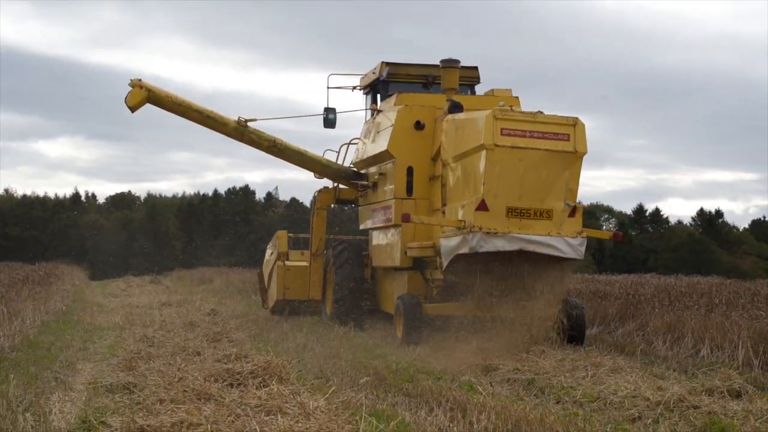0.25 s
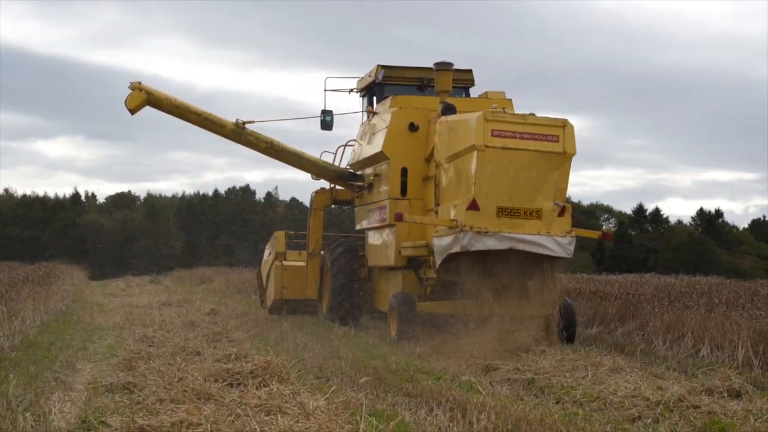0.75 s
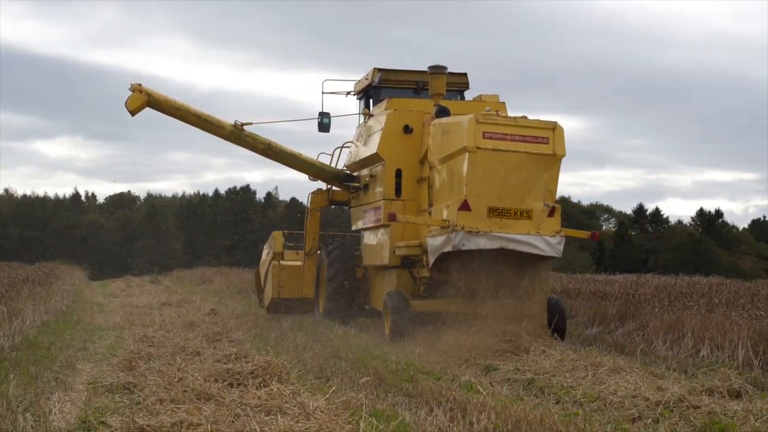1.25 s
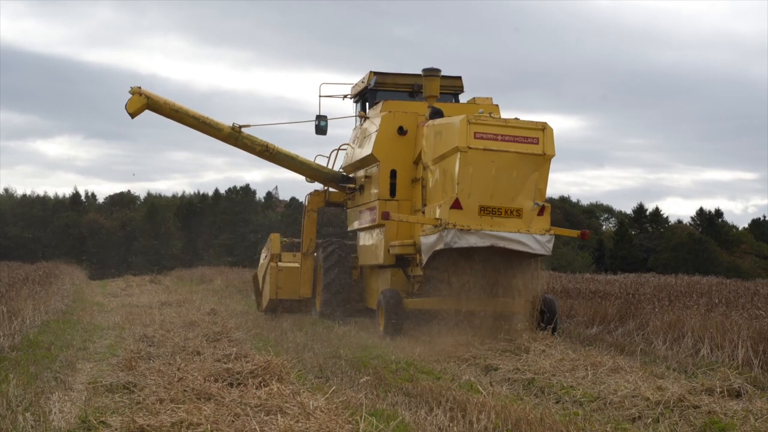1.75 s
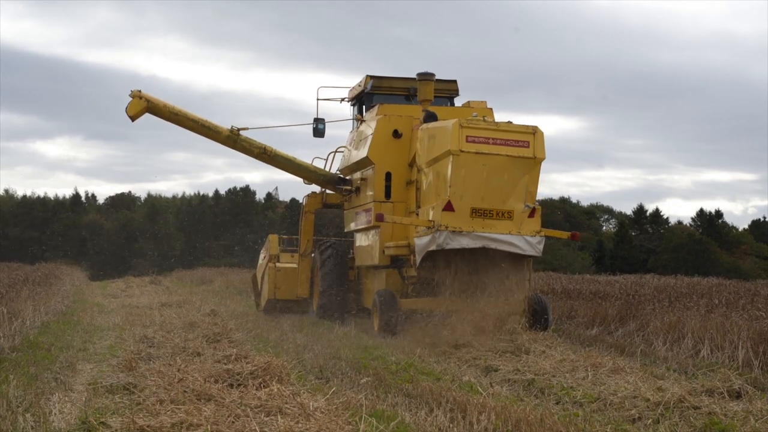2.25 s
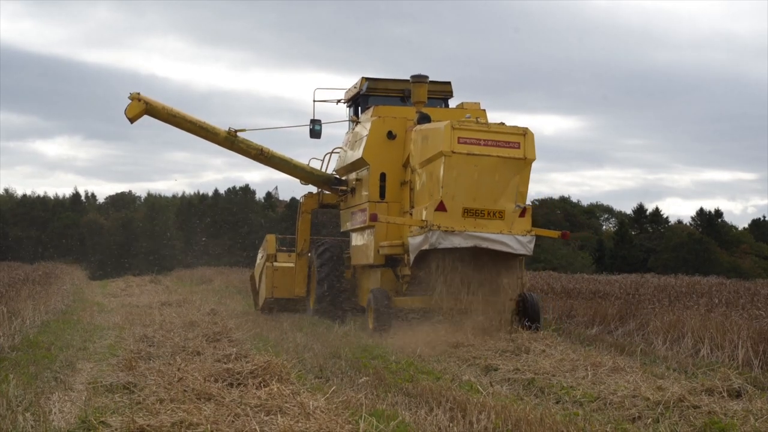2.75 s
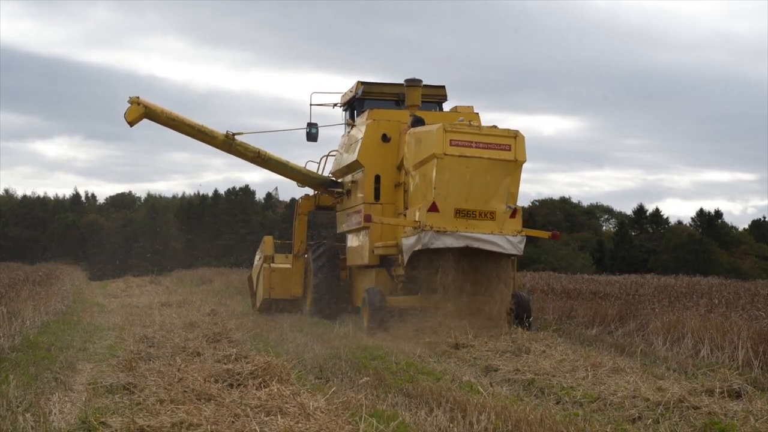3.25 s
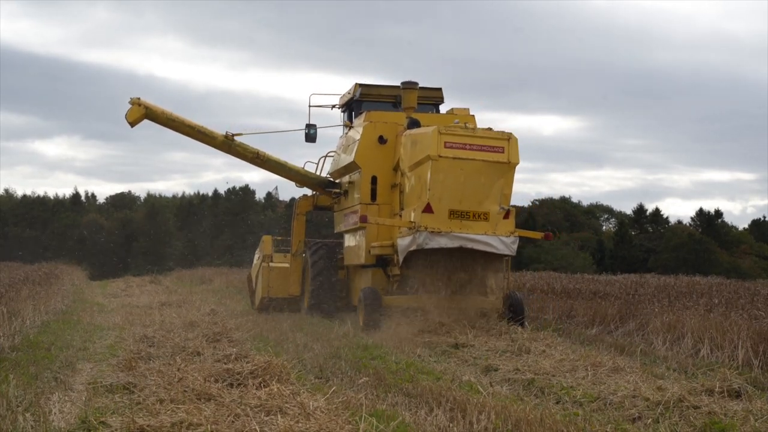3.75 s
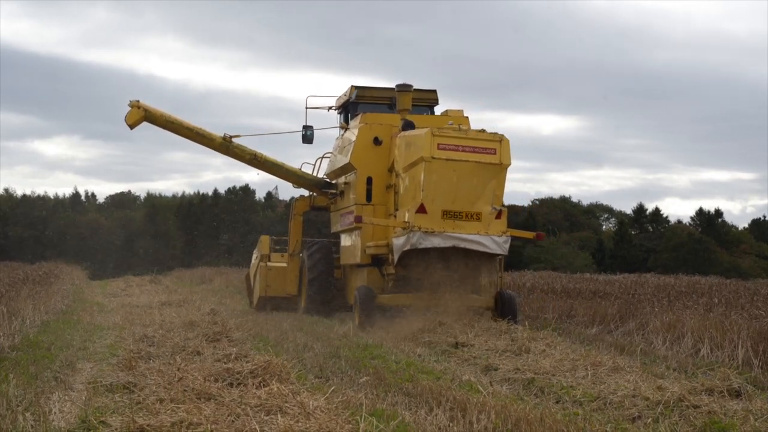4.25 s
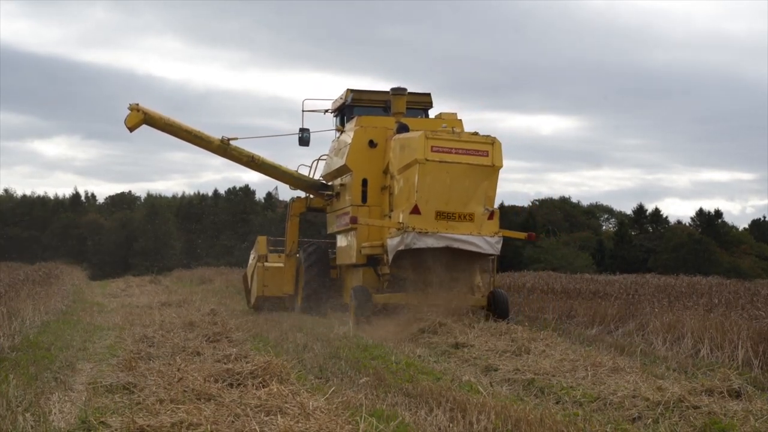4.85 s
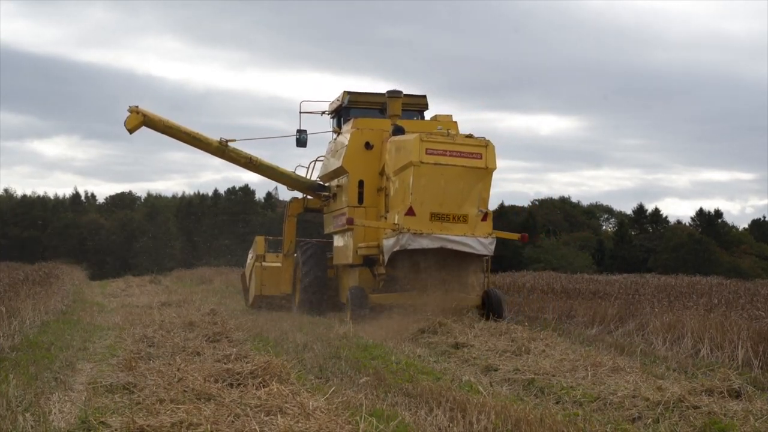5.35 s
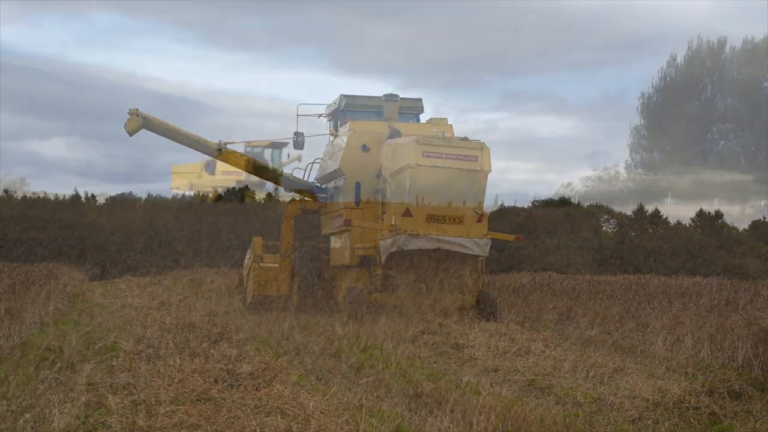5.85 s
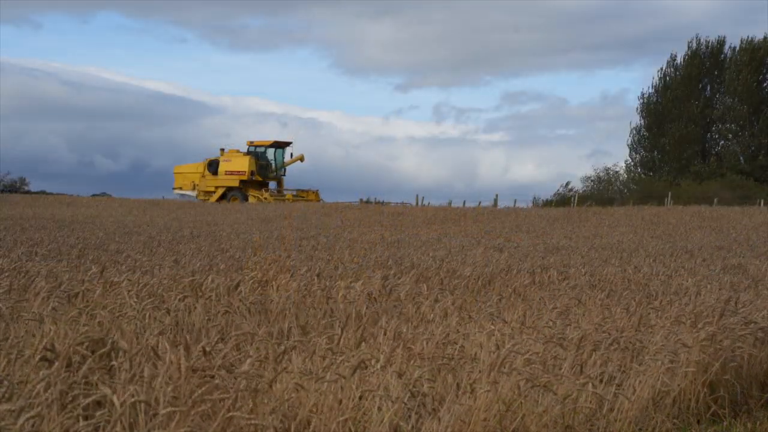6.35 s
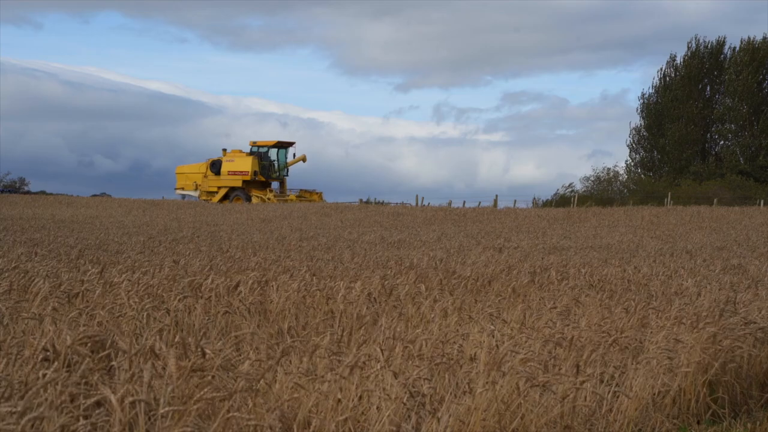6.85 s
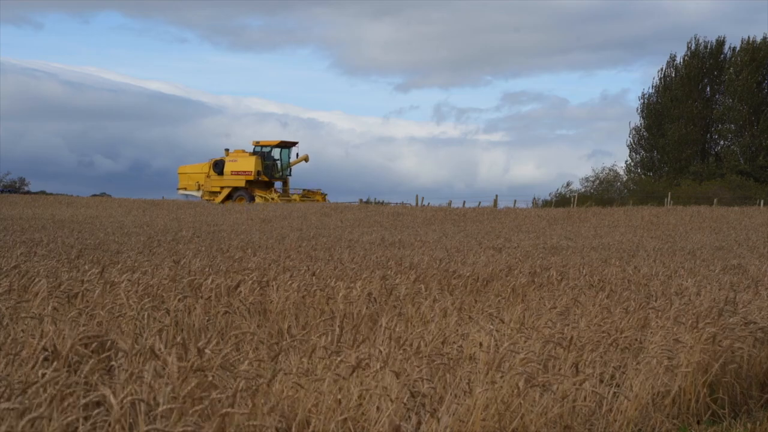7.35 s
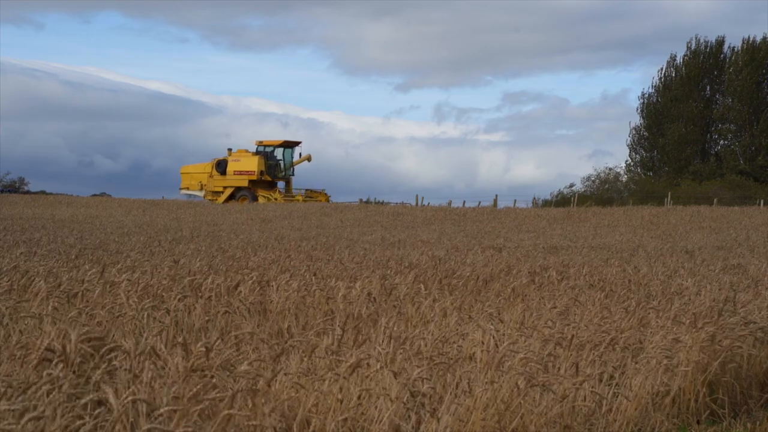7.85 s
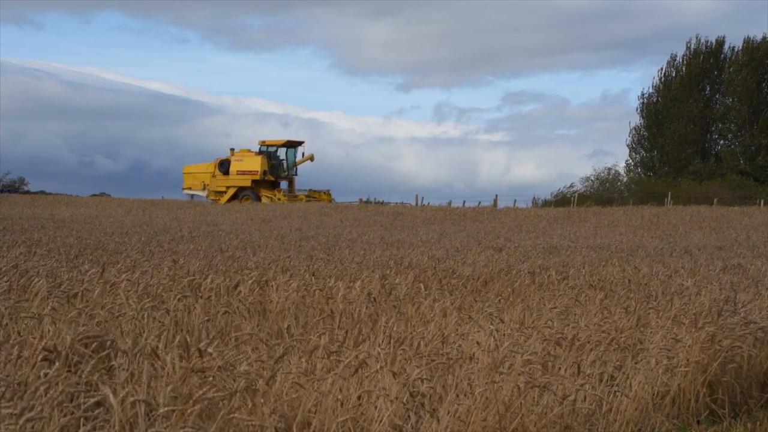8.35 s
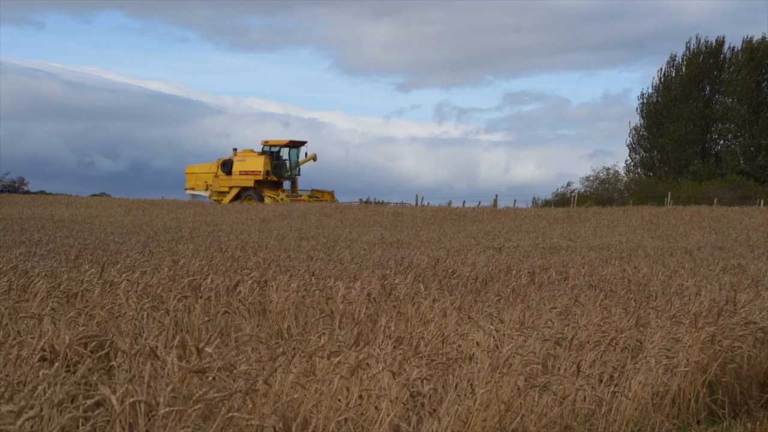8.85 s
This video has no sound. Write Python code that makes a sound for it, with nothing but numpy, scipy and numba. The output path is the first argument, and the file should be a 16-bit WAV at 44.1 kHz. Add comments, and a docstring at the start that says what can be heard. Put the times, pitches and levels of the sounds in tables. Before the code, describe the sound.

Outdoors, exposed stereo microphone. First a loud, continuous harvester, engine hum locked with whirring shafts over a rough noisy roar, slightly throbbing, with wind rumbling over it. A smooth cross-fade of under a second then leads to a much quieter view across the crop: distant engine note, blurred gear whine, thin roar, brief dry scrapes of grain stalks close by, and a closing cluster of low wind thumps.

```python
"""A combine harvester at work: first close, then, after a cross-fade, far off across the crop.
Close: sines in locked shaft orders (six-cylinder diesel, rotor, belt drives) hum over the noise roar of
threshing and flying straw, and low noise gusts buffet two microphone ports.
Far: a few engine-note sines, a gear whine of narrow-band noise and a thin noise roar carry over the field;
nearby dry stalks rustle in noise flurries and single low buffets strike the ports."""
import sys
import numpy as np
from scipy import signal
from scipy.fft import rfft, irfft, next_fast_len
from scipy.io import wavfile
from scipy.ndimage import uniform_filter1d
from numba import njit

SR = 44100
rng = np.random.default_rng(int(sys.argv[2]) if len(sys.argv) > 2 else 0)


def master_out(mix):
    """Clip the mix to full scale and print it as 16-bit PCM to the path in sys.argv[1]."""
    frames = np.transpose(np.atleast_2d(mix))
    ceiling = np.clip(frames, -1, 1)
    pcm = np.round(ceiling * 32767).astype(np.int16)
    wavfile.write(sys.argv[1], SR, pcm)


def voltage_ratio(decibels):
    """Convert decibels (scalar or array-like) to amplitude ratios, 20 dB per decade."""
    exponent = np.asarray(decibels, float) / 20
    return 10 ** exponent


N = 401297
T = np.arange(N) / SR
T_COARSE = T[::32]  # envelope grid
M = next_fast_len(N + 8192)
HZ = np.arange(M // 2 + 1) * SR / M

# left-right likeness of the far sources: f/Hz, likeness/0-1
FAR_LIKENESS = [(60, 0.94), (130, 1), (290, 1), (640, 1), (1410, 0.89), (3100, 0.85), (6820, 0.91),
                (15000, .1)]


def curves(table):
    """Columns of a time table, one value a sample."""
    s, *columns = np.transpose(table)
    return [np.interp(T, s, c) for c in columns]


def over_hz(table):
    """A frequency table interpolated over log frequency at every bin."""
    hz, value = np.transpose(table)
    return np.interp(np.log(HZ + 1), np.log(hz + 1), value)


def unit(x):
    """Scaled to rms 1."""
    return x / np.sqrt(np.mean(x ** 2))


def white():
    """White noise of rms 1."""
    return rng.standard_normal(N)


def walk(rate_hz):
    """Random levels held 1 / rate_hz and smoothed twice; rms 1."""
    hold = max(int(SR / rate_hz), 2)
    steps = np.repeat(rng.standard_normal(N // hold + 1), hold)
    smooth = uniform_filter1d(uniform_filter1d(steps, hold), hold)
    return unit(smooth[:N])


def pair(source, colour, likeness):
    """Stereo from two takes of a source, shared and unshared parts weighted per frequency, then coloured."""
    alike = np.clip(over_hz(likeness), 0, 1)
    mid = rfft(source(), M) * np.sqrt(1 + alike)
    side = rfft(source(), M) * np.sqrt(1 - alike)
    # unit white noise comes out at the colour's dB per Hz
    gain = voltage_ratio(over_hz(colour)) * np.sqrt(SR) / 2
    return irfft(np.array([mid + side, mid - side]) * gain, M)[:, :N]


def band_gain(colour, lo_hz, hi_hz):
    """The gain that brings this band of a colour to rms 1."""
    inside = (HZ > lo_hz) & (HZ < hi_hz)
    power = np.sum(voltage_ratio(over_hz(colour)[inside]) ** 2) * SR / M
    return 1 / np.sqrt(power)


def orders(turns, table, waver_db, rate_hz):
    """Sines locked to a shaft; each wavers in level, the high orders more deeply."""
    wavers = [waver_db * walk(rate_hz) for _ in range(6)]
    start_turns = rng.random(len(table))
    total = np.zeros(N)
    for i, (multiple, db) in enumerate(table):
        level = voltage_ratio(db + (1 + multiple / 35) * wavers[i % 6])
        total += np.sqrt(2) * level * np.sin(2 * np.pi * (multiple * turns + start_turns[i]))
    return total


def grains(per_s, spread_db):
    """Scattered one-sample ticks, a few large ones among many small; rms 1."""
    hits = rng.random(N) < per_s / SR
    size = voltage_ratio(spread_db * np.minimum(rng.exponential(size=N), 3))
    return unit(hits * rng.standard_normal(N) * size)


def strikes(s, size, attack_s, decay_s):
    """Sum of envelopes that rise linearly from each time and die away exponentially."""
    since_s = T_COARSE - np.reshape(s, (-1, 1))
    rise = np.clip(since_s / attack_s, 0, 1)
    fall = np.exp(-np.maximum(since_s - attack_s, 0) / np.reshape(np.abs(decay_s), (-1, 1)))
    return np.interp(T, T_COARSE, size @ (rise * fall))


def near_machine():
    """Engine and shaft orders over a roar that throbs with the firings; straw ticks against the hood."""
    # engine: t/s, twice the firing rate f/Hz, relative level/dB
    engine = [(0, 170.2, -0.5), (.6, 168.7, -1), (1.4, 168.7, 0.5), (1.9, 169.7, -1), (2.4, 168.7, .5),
              (3.4, 169.3, 1.5), (4.2, 169.9, 0.5), (5, 168.9, 0.5), (5.6, 169.2, -0.5), (6.5, 170.3, 2)]
    # engine orders: multiple of crank speed, relative level/dB
    crank = [(3, -28.5), (5, -33.8), (6, -17.4), (7, -33.8), (9, -30.2), (10, -39.7), (11, -37.0),
             (12, -39.8), (13, -45.7), (14, -44.1), (15, -38.7), (16, -48.8), (18, -50.0), (19, -48.6),
             (20, -48.8), (21, -44.5), (25, -49), (26, -48.8), (27, -44.9), (29, -46.5), (31, -42.2),
             (32, -46.1), (33, -44.9), (35, -47.7), (37, -50.0), (38, -50.4), (46, -47.6), (47, -48.7),
             (48, -47.8), (49, -48.1)]
    # rotor orders: multiple of rotor speed, relative level/dB
    rotor = [(6, -29.3), (18, -41.8), (32, -52.4), (36, -42.5), (37, -51.9), (38, -50.5), (39, -49.5),
             (40, -49.9), (41, -41.6), (42, -43.6), (44, -44.8), (47, -47.6), (48, -50.0), (49, -46.1),
             (51, -47.6), (57, -47.1), (65, -53.0), (68, -55.3), (69, -54.7), (72, -56.0), (78, -51.1),
             (81, -48.6), (86, -51.7), (87, -54.9), (93, -58.5), (96, -49.4), (99, -50.8), (117, -55.9)]
    # other belt-driven shafts: multiple of crank speed, relative level/dB
    shafts = [(1.67, -43.1), (3.33, -32.3), (3.92, -27.0), (5.58, -32.8), (6.88, -34.8), (7.29, -36.9),
              (7.83, -37.3), (11.54, -42.0), (17.21, -51.7), (29.12, -45.5), (30.08, -46.1), (43.12, -49.7),
              (43.71, -46.4), (48.58, -46.2), (56.12, -57.0), (63.12, -59.9)]
    # roar spectrum, lower and upper part: f/Hz, relative density/dB per Hz
    roar_colour = [(30, -70), (50, -58), (80, -47.5), (130, -47.5), (200, -47.5), (300, -56), (450, -75.5),
                   (550, -65), (700, -63.5), (900, -54.5), (1150, -66), (1350, -58), (1500, -66),
                   (1750, -67.5)] + [(1950, -62), (2200, -72), (2600, -71), (3050, -73.5), (3700, -73.5),
                                      (4100, -79.5), (4800, -79.5), (5300, -74.5), (5800, -78), (7500, -84),
                                      (8200, -84.5), (8750, -85), (9300, -86.5), (10200, -84), (11100, -92),
                                      (12300, -91), (15600, -96.5)]
    # left-right likeness of the roar: f/Hz, likeness/0-1
    likeness = [(60, 0.5), (130, 1), (290, .85), (640, 1), (1410, 0.8), (3100, 1), (6820, 0.88),
                (15000, 0.57)]
    # machine level before dips: t/s, level/dB
    level = [(0, -40.5), (1, -39.5), (2.7, -39), (4, -38), (4.7, -39), (5, -37), (5.6, -36.5)]
    # brief level dips (negative: rise): t/s, depth/dB, recovery/s
    dips = [(.33, 3.5, 0.18), (1.01, 2.5, 0.073), (1.41, 2.5, .06), (1.72, 2.5, 0.099), (3.7, 4, 0.076),
            (4.15, 2, 0.051), (4.39, 1, .06), (6.21, -1, .1)]
    rotor_per_crank, dip_fall_s = .58716, 0.023

    note_hz, exhaust_db = curves(engine)
    crank_hz = note_hz * (1 + .0008 * walk(12)) / 6
    turns = np.cumsum(crank_hz) / SR
    lines = voltage_ratio(exhaust_db) * orders(turns, crank, 1.38, 14.)
    lines += voltage_ratio(0.2) * orders(turns * rotor_per_crank, rotor, 1.24, 12.)
    lines += orders(turns, shafts, 1.78, 6.)

    firing_db = 0.61 * np.cos(2 * np.pi * 3 * turns)  # three firings a crank turn
    throb = voltage_ratio(firing_db + 0.6 * walk(18) + 0.34 * walk(60))

    def threshing():
        """Throbbing noise with straw ticks."""
        return throb * (white() + 0.29 * grains(900, 3.0))

    roar = pair(threshing, roar_colour, likeness)
    s, depth_db, recovery_s = np.transpose(dips)
    level_db = curves(level)[0] - strikes(s - dip_fall_s, depth_db, dip_fall_s, recovery_s)
    return (voltage_ratio(1.5) * lines + roar) * band_gain(roar_colour, 2000, 10000) * voltage_ratio(level_db)


def gusts():
    """Envelope of a wavering breeze with bell-shaped gusts on top."""
    # gusts: centre t/s, peak level/dB, half-width at 1/e /s
    bells = [(.1, -25, .05), (.35, -20, 0.096), (.58, -36, 0.054), (1.03, -23, 0.042), (1.3, -23.5, 0.091),
             (1.7, -27, 0.056), (2.1, -24.5, .12), (2.4, -30, 0.046), (3.2, -24, 0.053), (3.68, -28, 0.059),
             (4.1, -33, 0.056), (4.7, -34, 0.042), (5, -32, .05), (5.4, -35, 0.13), (6.05, -30.5, .08),
             (6.44, -39, 0.06), (6.55, -39, .02), (6.91, -34.5, 0.093), (7.45, -45, 0.055),
             (8.57, -35, .05), (8.8, -35, 0.059), (9, -32, .02)]
    # wind between gusts: t/s, level/dB
    breeze = [(0, -32), (1.5, -36), (2.6, -32.5), (4.3, -30), (5.1, -42.5), (5.9, -28.5), (6.4, -38),
              (6.7, -42), (7.05, -46.5), (7.2, -66), (7.6, -53), (8, -62), (8.4, -36.5), (8.95, -29.5),
              (9.1, -21.5)]
    s, db, half_s = np.transpose(bells)[:, :, None]
    bell_sum = np.sum(voltage_ratio(db) * np.exp(-((T_COARSE - s) / half_s) ** 2), axis=0)
    return voltage_ratio(curves(breeze)[0] + 1.5 * walk(10)) + np.interp(T, T_COARSE, bell_sum)


def wind(rise):
    """Eddies strike the ports in uneven thumps; the strongest are single sharp buffets."""
    # close-view wind spectrum: f/Hz, relative density/dB
    close_colour = [(25, -23), (50, 1.5), (100, 0), (180, 5), (300, 3.5), (500, -7.5), (900, -18.5),
                    (2000, -52.5)]
    # far-view wind spectrum: f/Hz, relative density/dB
    far_colour = [(25, -18), (50, -3.5), (100, 4), (180, 2), (300, -5), (500, -16.5), (900, -27),
                  (2000, -59.5)]
    # left-right likeness of wind: f/Hz, likeness/0-1
    likeness = [(60, 0.67), (130, 0.95), (290, 0.01), (640, .01)]
    # single buffets: t/s, relative peak level/dB
    buffets = [(6.162, -16), (6.441, -22), (6.54, -20.5), (6.749, -31), (6.915, -22), (7.465, -29),
               (7.759, -41), (8.412, -13.5), (8.497, -15.5), (8.549, -19), (8.604, -11), (8.655, -14),
               (8.715, -17), (8.773, -18), (8.846, -13), (8.921, -16.5), (8.982, -15)]
    # buffet spectrum: f/Hz, relative level/dB
    buffet_colour = [(40, -10), (150, 6.5), (300, 5.5), (600, 2.5), (900, -15.5), (1500, -24), (3000, -52)]

    def eddies(colour):
        """Noise in uneven thumps."""
        noise = pair(lambda: voltage_ratio(2.36 * walk(70)) * white(), colour, likeness)
        return noise * band_gain(colour, 202, 630)

    s, db = np.transpose(buffets)
    pulse_peak = np.sum(voltage_ratio(over_hz(buffet_colour))) * np.sqrt(SR) / M

    def blows():
        """One push or pull per buffet, with a weaker rebound."""
        x = np.zeros(N)
        size = voltage_ratio(db) * rng.choice([-1, 1], size=len(s))
        x[((s + .004) * SR).astype(int)] = size
        x[((s + .0056) * SR).astype(int)] = -.7 * size
        return x / pulse_peak

    blend = (1 - rise) * eddies(close_colour) + rise * eddies(far_colour)
    return blend * gusts() + voltage_ratio(-1.5) * pair(blows, buffet_colour, likeness)


def far_machine():
    """Only the exhaust note, a blurred gear whine and a thin roar carry across the field."""
    # engine note: t/s, f/Hz, level/dB
    engine_note = [(5.5, 154.7, -39), (6.6, 154.2, -38), (7, 153.9, -38.5), (7.5, 153.4, -37),
                   (8.2, 154.6, -33), (8.6, 153.4, -42), (9.1, 153.5, -45)]
    # note orders: multiple of the note, relative level/dB
    note_orders = [(.5, -9.5), (1, 1), (1.5, -16)]
    # whine spectrum: f/Hz, relative density/dB
    whine_colour = [(780, -35), (865, -3.5), (892, 2.5), (920, -9), (990, -16), (1040, -8), (1070, -2),
                    (1095, -26), (1200, -39.5)]
    # roar spectrum, lower and upper part: f/Hz, relative density/dB per Hz
    roar_colour = [(30, -66), (50, -55), (90, -44), (130, -50), (200, -52), (300, -64), (420, -71.5),
                   (600, -67), (800, -67), (950, -64.5), (1150, -69.5), (1350, -63), (1550, -75.5),
                   (1750, -64.5)] + [(1900, -63), (2050, -76.5), (3500, -81.5), (4400, -91), (5500, -90),
                                     (6500, -87), (8500, -103), (11000, -107), (15600, -108)]
    # levels as the air carries them: t/s, roar level/dB, whine level/dB
    levels = [(6.3, -54, -68), (6.58, -50.5, -57), (6.86, -54, -61), (7, -46, -53), (7.33, -47, -56),
              (7.38, -46.5, -48.5), (7.82, -47.5, -48), (7.9, -45.5, -51.5), (8.25, -46.5, -50),
              (8.4, -44.5, -56), (8.7, -41.5, -56), (8.8, -44, -61), (9.1, -45, -61)]

    roar_db, whine_db = curves(levels)
    note_hz, note_db = curves(engine_note)
    note = voltage_ratio(note_db) * orders(np.cumsum(note_hz) / SR, note_orders, 0.8, 14.)
    # air turbulence smears the whine into two narrow bands
    whine = pair(white, whine_colour, FAR_LIKENESS) * band_gain(whine_colour, 860, 930)
    flicker = voltage_ratio(1.1 * walk(11))
    roar = pair(lambda: flicker * white(), roar_colour, FAR_LIKENESS)
    roar *= band_gain(roar_colour, 1100, 2000)
    return note + voltage_ratio(whine_db) * whine + voltage_ratio(roar_db) * roar


def stalks():
    """Dry ears scrape each other in short flurries: thin husks tick high, stalks lower."""
    # husk spectrum: f/Hz, relative level/dB
    husk_colour = [(3500, -35), (4600, -8.5), (5400, -2), (6300, -11), (8500, -18), (12000, -47)]
    # stalk spectrum: f/Hz, relative level/dB
    stem_colour = [(1200, -25), (2300, -7.5), (3500, -1.5), (4100, -6), (5000, -30)]
    # scrapes: peak t/s, husk level/dB, stalk level/dB, decay/s
    scrapes = [(6.195, -45, -42, .01), (6.305, -54, -54, 0.012), (6.455, -64, -70, 0.0066),
               (6.483, -59, -64, .008), (6.537, -55, -49, 0.019), (6.608, -57, -50, .012),
               (6.955, -58, -52, 0.025), (7.03, -55, -53, .012), (7.326, -47, -53, .01),
               (7.382, -41, -39.5, 0.017), (7.42, -53, -49, 0.024), (7.452, -47, -41, 0.014),
               (7.8, -58, -55, .02), (7.879, -54, -59, 0.0075), (8.225, -51, -50, .015),
               (8.3, -44, -54, 0.0074), (8.59, -53, -50, .015), (8.645, -50, -46, .04),
               (8.72, -55, -47, 0.016), (8.802, -56, -49, .05), (8.945, -62, -60, .02)]
    # rustle between scrapes: t/s, husk level/dB, stalk level/dB
    sway = [(6.3, -65, -62.5), (6.9, -67.5, -65), (7.15, -63, -54), (7.6, -59, -56.5), (8.1, -60, -56.5),
            (8.45, -57, -53), (9.1, -64, -59)]
    attack_s, waver_db = 0.016, 2

    flurry = voltage_ratio(1.3 * walk(70))
    s, husk_db, stem_db, decay_s = np.transpose(scrapes)
    husk_bed_db, stem_bed_db = curves(sway)

    def rustle(colour, bed_db, scrape_db):
        """Coloured noise and ticks under a wavering bed plus scrapes."""
        noise = unit(pair(lambda: flurry * (white() + 0.4 * grains(1500, 3.9)), colour, FAR_LIKENESS))
        bed = voltage_ratio(bed_db + waver_db * walk(25))
        return noise * (bed + strikes(s - attack_s, voltage_ratio(scrape_db), attack_s, decay_s))

    return rustle(husk_colour, husk_bed_db, husk_db) + rustle(stem_colour, stem_bed_db, stem_db)


def ports(x):
    """The housing gives each port its own level and phase per frequency; the bearing tilts the balance."""
    # housing level: f/Hz, left minus right level/dB
    port_db = [(60, 2.5), (110, 3), (200, 2), (380, 1), (700, 3), (1290, 0.0), (2380, -4.5), (4400, 2.5),
               (8120, -3.5), (15000, 5.5)]
    # housing phase: f/Hz, left lead/rad
    port_phase = [(0, 1.15), (430, 0.33), (1460, -0.56), (1890, 2), (2580, -0.0), (4220, 0.76),
                  (4650, 1.05), (5430, 1.13), (6460, -1.6), (8100, 1.5), (8700, 0.75), (9300, 1.1),
                  (10200, -0.0), (15200, -0.5)]
    # machine bearing: t/s, left minus right level/dB beyond the housing's own
    bearing = [(0, -1), (1, -.5), (2, -0.5), (3, 0.1), (4, 0.3), (5, 0.5), (5.8, 1), (6.5, -0.7), (8, -1.5),
               (9.1, 1.5)]
    half = voltage_ratio(over_hz(port_db) / 2) * np.exp(.5j * over_hz(port_phase))
    turn = voltage_ratio(curves(bearing)[0] / 2)
    housed = irfft(rfft(x, M) * np.array([half, 1 / half]), M)[:, :N]
    return housed * np.array([turn, 1 / turn])


def scene():
    """The far view fades in as the close one fades out."""
    start_s, end_s = 5.606, 6.44
    rise = np.clip((T - start_s) / (end_s - start_s), 0, 1)
    close = (1 - rise) ** 1.55 * near_machine()
    far = rise * (far_machine() + stalks())
    return ports(close + far) + wind(rise)


@njit
def limit(x, top, attack, release):
    """Gain control: gain falls as the tracked peak passes top, then creeps back; rates per sample."""
    y, peak = np.empty(len(x)), 0.
    for i in range(len(x)):
        size = abs(x[i])
        peak += (size - peak) * (attack if size > peak else release)
        y[i] = x[i] * min(1., top / (peak + 1e-9))
    return y


def low_pass(x):
    """Removes everything above the highest recorded frequency."""
    return signal.sosfilt(signal.butter(12, 15650, fs=SR, output="sos"), x)


def record(dry):
    """Preamplifier hiss, then each port has its own gain control."""
    # hiss spectrum: f/Hz, density/dB per Hz
    hiss_colour = [(1000, -130), (5000, -112), (9000, -108), (15600, -109)]
    hiss = pair(white, hiss_colour, [(100, .05), (15000, .05)])
    mix = np.array([limit(side, 0.43, 0.034, 0.00078) for side in dry + hiss])
    return low_pass(mix)


dry = scene()
out = record(dry)
master_out(out)
```